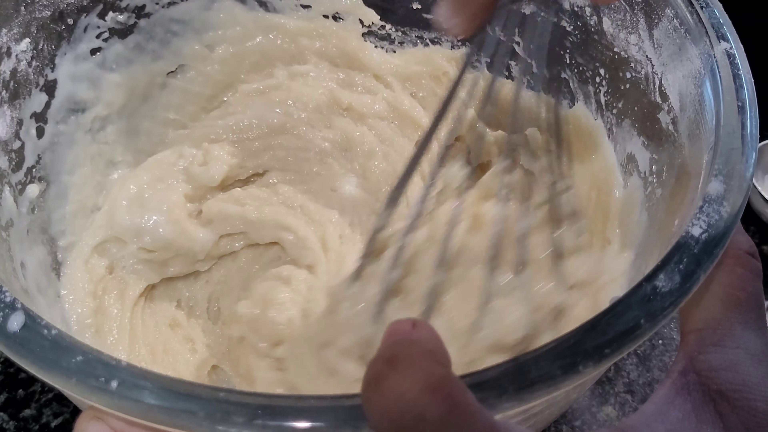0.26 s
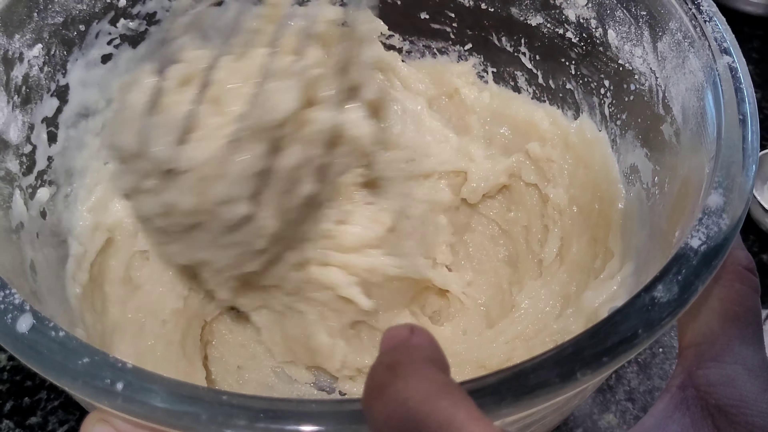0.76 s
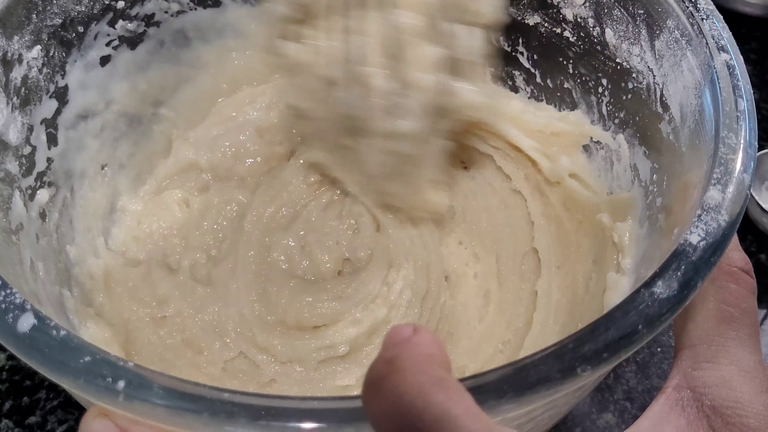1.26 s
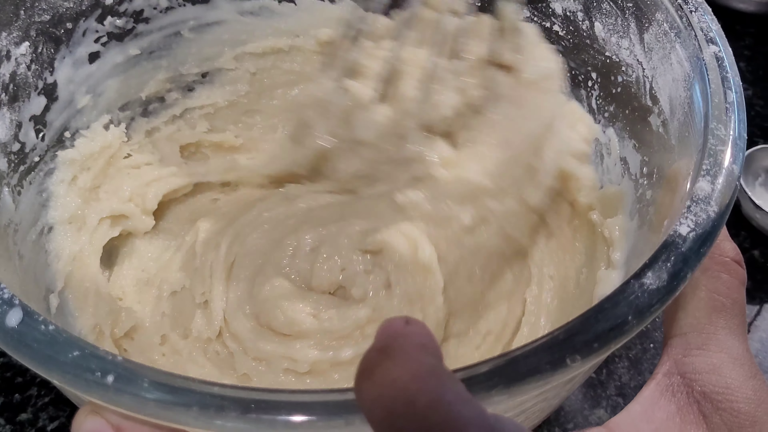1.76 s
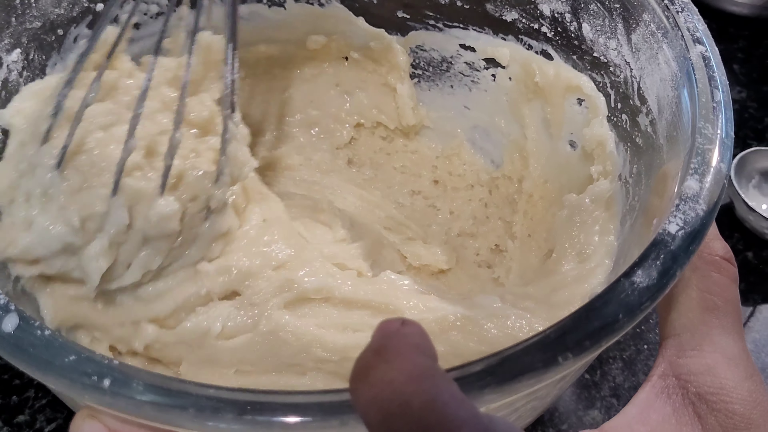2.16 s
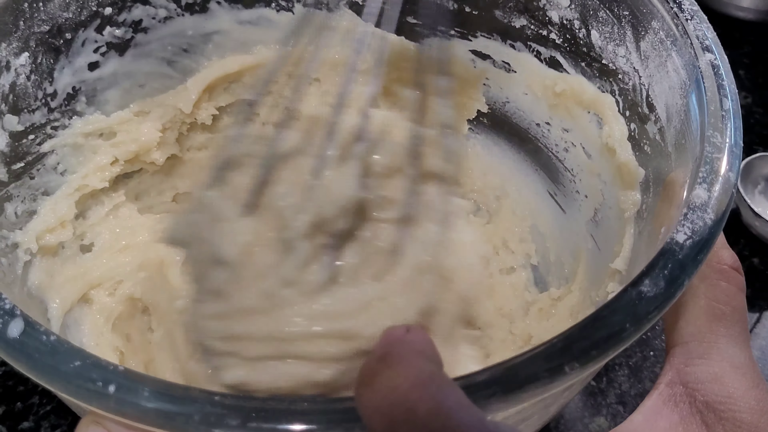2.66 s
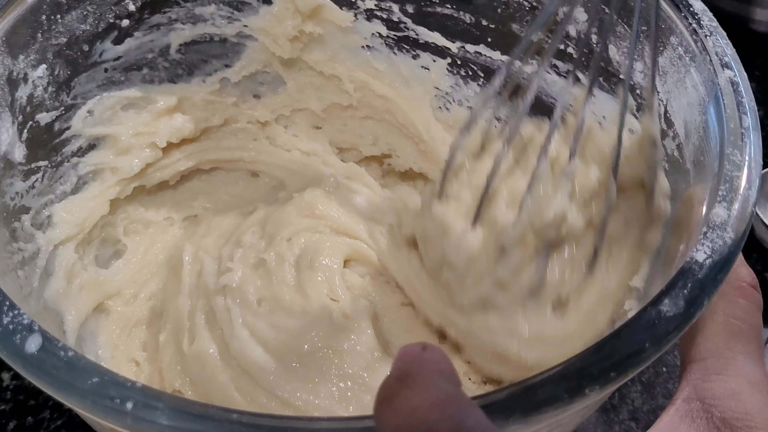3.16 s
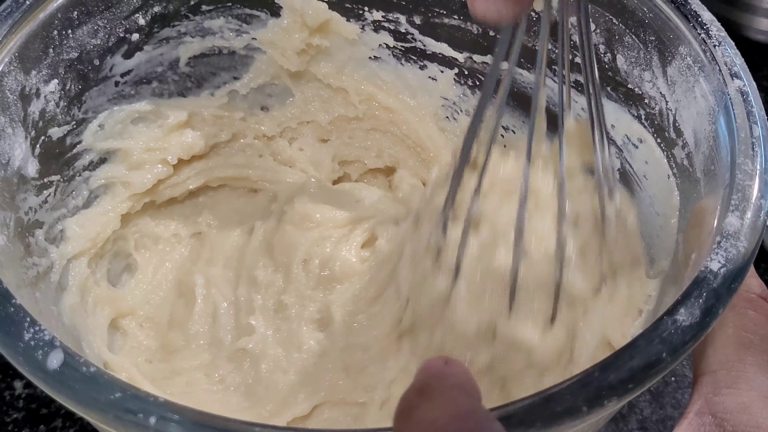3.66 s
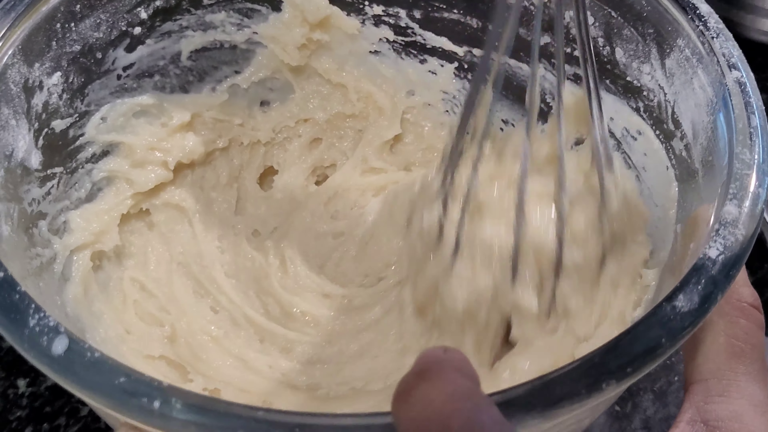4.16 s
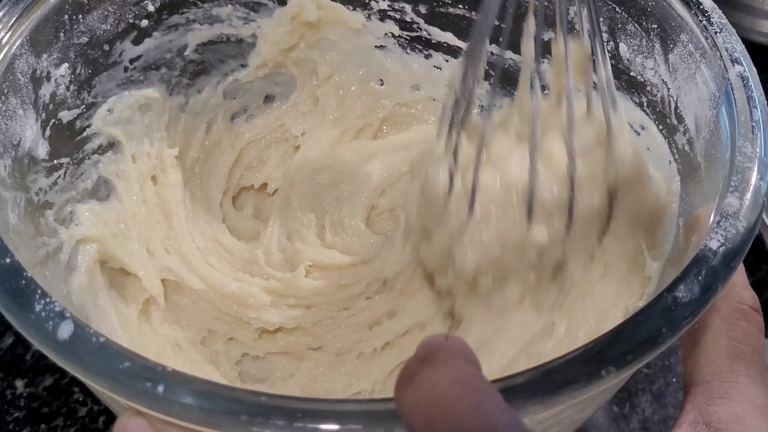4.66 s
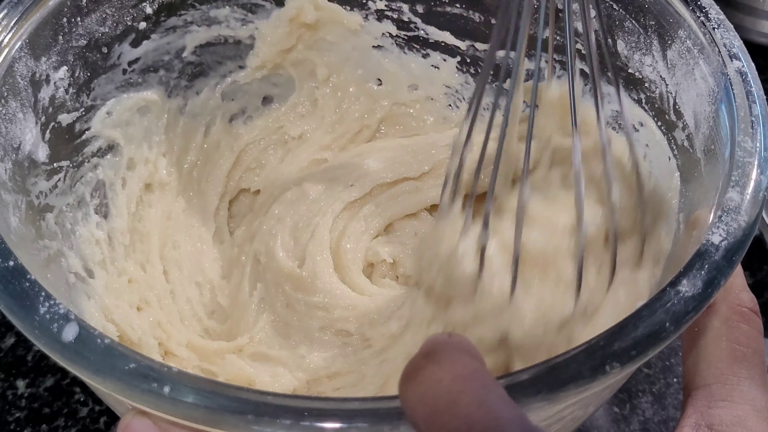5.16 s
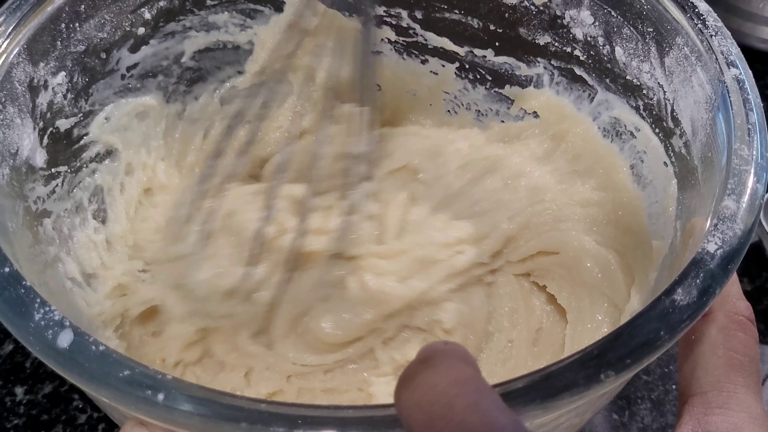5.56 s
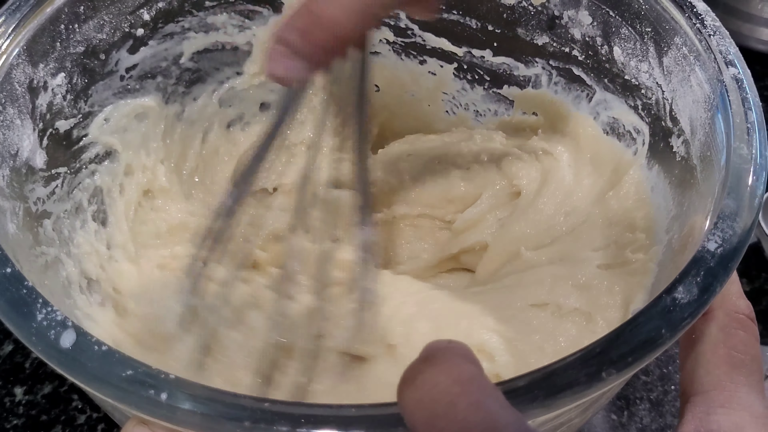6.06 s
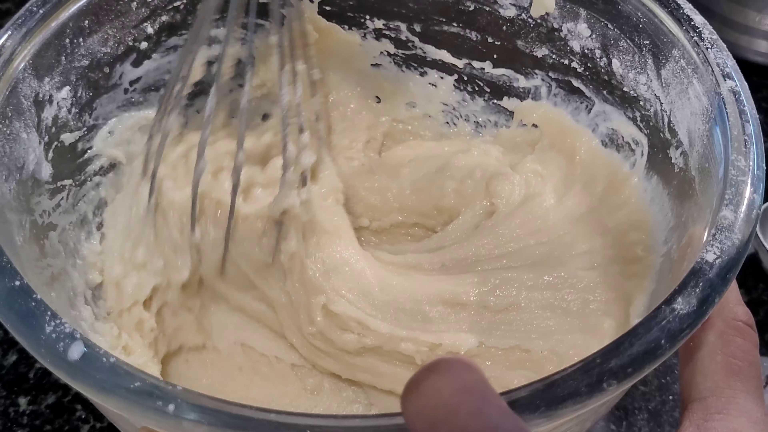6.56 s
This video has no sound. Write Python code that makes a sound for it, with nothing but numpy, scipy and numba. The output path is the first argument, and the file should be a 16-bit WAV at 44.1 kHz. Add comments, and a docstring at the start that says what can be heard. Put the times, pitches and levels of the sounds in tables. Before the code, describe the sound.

Hand whisking of stiff batter heard from very near, in stereo: repeated short scrapes swell and drop away, bright and gritty with a duller wet smear beneath. Wires tick on glass. Uneven thumps of the bowl on the counter punctuate the strokes, strongest in the first half, with brief hollow ringing and a short kitchen echo. Very faint squeaks and a quiet low background hum sit behind.

```python
"""In a small kitchen, a wire whisk drags thick batter round a glass bowl held on a stone counter, close to a phone.
Shaped noise makes the wires scrape and tick, the batter smack, and the low rumble and hiss behind.
The bowl rocks and now and then knocks on the counter: short pushes set off decaying sines for bowl and counter.
Delay lines let counter and kitchen ring on; small sine bursts are popping air, wavering tones are squeaks."""
import sys
import numpy as np
from scipy import signal
from scipy.fft import rfft, irfft, next_fast_len
from scipy.io import wavfile
from scipy.ndimage import uniform_filter1d
from numba import njit

SR = 44100
rng = np.random.default_rng(int(sys.argv[2]) if len(sys.argv) > 2 else 0)


def output_pcm(signal):
    """Save a mono or channel-first signal as 16-bit PCM at the path in sys.argv[1].

    Samples are clipped to [-1, 1] before scaling.
    """
    pcm = np.clip(np.atleast_2d(signal).T, -1, 1) * 32767
    wavfile.write(sys.argv[1], SR, np.round(pcm).astype(np.int16))


N = 299439

# ringing tones of the glass bowl: f/Hz, signed gain left, signed gain right, time to fall 60 dB/s
GLASS_MODES = [(279, .6, 1, .25), (722, .5, 1, .14), (1060, .6, .4, .1), (1180, -1, -1, .1),
               (1450, .6, .3, .05), (1620, 1, .5, .05), (2635, .6, .5, .05), (2680, .9, 1, .065),
               (4128, .7, .6, .04), (4260, .6, .7, .03)]


def undb(db):
    """Turns decibels into a factor."""
    return 10 ** (np.asarray(db) / 20)


def level(x, db):
    """Sets the average (RMS) level of x."""
    return x * undb(db) / np.sqrt(np.mean(x ** 2))


def curve(table):
    """Columns of a table, joined by straight lines in time."""
    s, *columns = np.transpose(table)
    return [np.interp(np.arange(N) / SR, s, c) for c in columns]


def sides(pan_db):
    """Left and right factors for a level difference, left minus right."""
    return undb(np.array([pan_db, -pan_db]) / 2)


def colour(x, table):
    """Shapes the spectrum of x by a table of f/Hz and gain/dB."""
    table_hz, db = np.transpose(table)
    size = next_fast_len(N)
    hz = np.arange(size // 2 + 1) * SR / size
    gain = undb(np.interp(np.log(hz + 1), np.log(table_hz), db))
    return irfft(rfft(x, size) * gain, size)[..., :N]


def band(x, lo_hz, hi_hz, order=2):
    """Keeps the sound between two frequencies."""
    sos = signal.butter(order, [lo_hz, hi_hz], "band", fs=SR, output="sos")
    return signal.sosfilt(sos, x)


def ring(x, hz, t60):
    """One ringing tone: every push starts a sine that falls 60 dB in t60 seconds."""
    r = np.exp(-np.log(1000) / (t60 * SR))
    w = 2 * np.pi * hz / SR
    # the tiny offset keeps the filter from slowing down on silence
    return signal.lfilter([0, r * np.sin(w)], [1, -2 * r * np.cos(w), r * r], x + 1e-18)


def walk(rate):
    """Random wandering: values held 1 / rate seconds, then smoothed twice."""
    k = int(SR / rate)
    steps = np.repeat(rng.standard_normal(N // k + 1), k)
    return uniform_filter1d(uniform_filter1d(steps, k), k)[:N]


def add(out, s, sound):
    """Mixes a sound into out, starting at s seconds."""
    i = int(s * SR)
    out[..., i:i + sound.shape[-1]] += sound[..., :N - i]


def kitchen():
    """House rumble, mostly alike at both microphones, under hiss that differs between them."""
    # deep rumble of the house: t/s, level/dB
    rumble_levels = [(0.0, -65), (0.05, -48), (0.21, -71), (0.74, -54), (1.21, -66), (1.28, -54.5),
                     (1.49, -66), (1.68, -47), (1.76, -83), (1.85, -62), (2.15, -68.5), (2.23, -45),
                     (2.42, -65.5), (3.46, -65.5), (3.52, -54.5), (3.67, -65), (5.77, -62.5), (5.88, -55),
                     (6.01, -73), (6.11, -49), (6.41, -76), (6.79, -61)]
    # tone of the steady background: f/Hz, relative gain/dB
    hush_tone = [(18, -46), (30, -30.5), (81, 2.5), (194, -0.5), (295, 2.5), (600, -6.5), (1190, -11.5),
                 (1280, -29), (1430, -13), (2100, -16), (3000, -32.5), (5170, -41), (5740, -19.5),
                 (7090, -16), (16000, -44)]
    low, wide = rng.standard_normal(N), rng.standard_normal((2, N))
    alike = low + .36 * wide
    rumble = level(band(alike, 47.2, 67.0), 0) + level(band(alike, 91, 190), -9)
    rumble = rumble * undb(curve(rumble_levels)[0])
    mixed = band(low, 84, 500, order=1) + band(wide, 280, .45 * SR, order=1)
    return rumble + level(colour(mixed, hush_tone), -63.5)


@njit
def walls(x, lags, gain, damp):
    """Eight delay lines feed each other like reflections, duller on every round."""
    line, soft, out = np.zeros((8, 4096)), np.zeros(8), np.zeros((2, len(x)))
    for i in range(len(x)):
        total = 0.
        for k in range(8):
            soft[k] += (1 - damp) * (gain[k] * line[k, (i - lags[k]) & 4095] - soft[k])
            total += soft[k]
            out[k % 2, i] += soft[k]
        for k in range(8):
            line[k, i & 4095] = x[i] + soft[k] - total / 4
    return out


def echoes(send):
    """Counter and kitchen ring on; long waves reach both microphones alike."""
    # lengths of the eight echo paths: delay/ms
    path_ms = [7.3, 9.7, 12.1, 15.7, 33, 23.9, 28.1, 32]
    t60_s, damp = 0.29, 0.15  # damp: treble loss per round, 0 to 1; it also shortens the fade
    lags = (np.array(path_ms) * SR / 1000).astype(np.int64)
    room = walls(send, lags, undb(-60 * lags / SR / t60_s), damp)
    return band(room[0], 27, 630, order=1) + band(room, 850, 15000, order=1)


def body(force, flex):
    """Bowl and counter ring; each microphone hears its own mix of the tones."""
    # ringing tones of bowl and counter: f/Hz, signed gain left, signed gain right, time to fall 60 dB/s
    body_modes = [(92.2, -0.0123, -0.0165, 0.31), (150.7, 0.03, 0.0256, 0.19), (245.5, -0.29, -0.41, 0.045),
                  (281.17, 0.043, 0.062, 0.25), (313.4, 0.29, 0.31, 0.054), (353, 0.03, 0.037, 0.38),
                  (383.3, 0.047, 0.24, 0.075), (434, -0.013, 0.089, 0.32), (439, 0.012, 0.0017, 0.59),
                  (499.7, -0.2, -0.47, 0.041), (535, -0.0039, 0.52, 0.073), (610.5, -0.097, -0.36, 0.0693),
                  (635, -0.0041, 0.18, 0.033), (679, -0.036, -0.12, 0.15), (714.3, 0.27, 0.47, 0.088),
                  (746.2, -0.2, -0.84, 0.081), (787, -0.27, 0.022, 0.081), (831, 0.16, -0.16, 0.078),
                  (896, -0.076, -0.32, 0.088), (937, -0.044, 0.29, 0.059), (1062, 0.0028, 0.084, 0.23),
                  (1090, -0.037, 0.13, 0.131), (1160, -0.02, 0.046, 0.045), (1188, -0.0081, -0.14, 0.1),
                  (1285, -0.0067, 0.0097, 0.14), (1382, 0.61, 0.27, 0.025), (1432, -0.51, -0.015, 0.062),
                  (1430, 0.16, -0.01, 0.13), (1560, 0.2, 0.015, 0.075), (1666, 0.21, -0.17, 0.041),
                  (1960, 0.15, 0.38, 0.037), (2040, 0.044, 0.17, 0.093), (2200, 0.26, -0.055, 0.04)]
    out = np.zeros((2, N))
    for hz, left, right, t60 in body_modes:
        push = flex if 120 < hz < 200 else force  # one deep tone is the slab flexing
        out = out + ring(push, hz, t60) * [[left], [right]]
    return out


def rocking():
    """Rocking and rubbing on the counter: uneven small bumps of the bowl's foot feed the same tones."""
    # how strongly the bowl rocks: t/s, level/dB
    rock_levels = [(0.0, -45.5), (0.09, -48), (0.26, -54.5), (0.64, -52.5), (0.77, -54.5), (1.27, -56),
                   (1.66, -61.5), (1.81, -55.5), (1.95, -61.5), (2.34, -48), (2.53, -59.5), (2.7, -54),
                   (2.93, -73), (3.14, -52), (3.29, -50.5), (3.48, -59), (3.74, -62), (3.95, -58),
                   (4.12, -57.5), (4.35, -54), (4.73, -60), (5.05, -55), (5.18, -81), (5.41, -63),
                   (5.71, -55), (5.92, -59), (6.01, -57.5), (6.24, -57.5), (6.41, -65), (6.79, -59)]
    bumps = rng.standard_normal(N) * undb(4.1 * walk(40))
    force = band(bumps, 59.0, 364, order=3)
    return level(body(force, 2.23 * force), 0) * undb(curve(rock_levels)[0])


def landings():
    """The foot lands and rebounds once; a softer landing is a longer push."""
    # knocks on the counter: t/s, blow/dB, push length/ms, rebound share of the blow, extra slab flex/dB
    knock_list = [(0.041, -35.5, 0.25, 1, 11.5), (0.077, -34, 0.65, 0.198, 0), (0.087, -40, 0.67, 0.3, 11),
                  (0.136, -35, 0.77, 0.26, -7), (0.253, -31.5, 0.74, 0.26, 10),
                  (0.282, -31, 0.97, 0.21, -5), (0.434, -39, 0.28, 0.3, -11),
                  (0.465, -25.5, 0.74, 0.56, -28), (0.573, -32, 1, 0.37, -7), (0.70, -36.5, 0.63, 0.43, 15),
                  (0.769, -28.5, 1, 0.4, -5), (1.228, -28, 0.71, 0.38, -5.5), (1.2174, -49, 0.19, 0.4, -4),
                  (1.595, -8.5, 0.27, 0.038, 12), (1.946, -19, 0.61, 0.55, 0.5),
                  (1.962, -41, 0.62, 0.14, -3), (2.005, -28.5, 0.7, 0.25, -10.5),
                  (2.2005, -5, 0.24, 0.061, 7), (2.2105, -10, 0.21, 0.22, 3.5),
                  (2.224, -18.5, 0.23, 0.22, -8.5), (2.9118, -16.5, 0.44, 0.41, -4),
                  (2.948, -36, 0.95, 0.3, -2), (2.972, -28, 0.59, 0.33, -9), (3.046, -36, 0.27, 0.35, -5),
                  (3.057, -36, 0.39, 0.31, -6.5), (3.18, -34, 0.64, 0.24, -3), (3.250, -22, 0.59, 0.3, -8),
                  (3.266, -37, 0.78, 0.34, -5.5), (3.312, -19.5, 0.58, 0.28, -7),
                  (3.329, -41, 0.53, 0.25, -4), (3.5151, -9.5, 0.24, 0.032, 7.5),
                  (3.5254, -21, 0.24, 0.18, -2), (3.5331, -19.5, 0.36, 0.16, 8),
                  (3.552, -18, 0.43, 0.27, 11), (4.285, -36.5, 0.5, 0.3, -7), (4.4389, -35, 0.152, 0.2, -7),
                  (4.448, -24, 0.52, 0.26, -8.5), (4.909, -32.5, 0.78, 0.13, 6),
                  (4.974, -37, 0.63, 0.19, -11), (5.043, -22, 0.541, 0.474, -1),
                  (5.103, -31, 0.67, 0.27, -9), (5.124, -29, 0.74, 0.19, 3), (5.51, -33.5, 0.79, 0.2, -10),
                  (5.536, -34, 0.84, 0.31, -7), (5.565, -34, 0.71, .1, -7), (5.5698, -11.5, 0.49, 0.25, -4),
                  (5.8126, -10.5, 0.56, 0.2, 0.5), (5.58, -27.5, 0.26, 0.21, -7.5),
                  (5.826, -29, 0.3, 0.16, -7.5), (5.864, -45, 0.89, 0.42, -6.5),
                  (5.959, -28, 0.78, 0.42, 0.5), (6.0615, -11, 0.35, 0.53, -1.5),
                  (6.072, -33.5, 0.11, 0.49, 6), (6.5872, -16.5, 0.51, 0.39, -1.5),
                  (6.601, -28, 0.48, 0.24, -3)]
    rebound_ms = 6.075
    chatter_db, chatter_t60_s = -22, 0.35
    lead = 88  # samples ahead of the middle of the push
    force, ms = np.zeros((2, N)), np.arange(-lead, 8000) / SR * 1000
    chatter_gain = undb(chatter_db - 60 * ms / 1000 / chatter_t60_s)
    for s, db, push_ms, share, flex_db in knock_list:
        push = np.exp(-(ms / push_ms) ** 2)
        again = np.exp(-((ms - rebound_ms) / push_ms) ** 2)
        edge = np.exp(-((ms + push_ms) / 0.2) ** 2)  # a small hard edge in front
        blow = (push + share * again) / push.sum() + 0.12 * edge / edge.sum()
        # the foot chatters on: about 600 random bumps a second, fading
        bumps = rng.standard_normal(len(ms)) * (rng.random(len(ms)) < 600 / SR) * (ms > 0)
        chatter = np.convolve(bumps * chatter_gain, push[:200] / push.sum())
        blow = blow + chatter[lead:lead + len(ms)]
        add(force, s - lead / SR, undb([[db], [db + flex_db]]) * blow)
    return force


def pings():
    """The glass is struck, by a wire or on landing; each strike mostly drives tones near its centre."""
    # strikes on the glass: t/s, strength/dB, centre f/Hz
    strike_list = [(0.97, -48, 4300), (1.5953, -32, 1550), (1.602, -26, 280), (1.611, -21, 730),
                   (2.194, -33, 2700), (2.2115, -22, 730), (2.2105, -23, 1170), (2.224, -27.5, 800),
                   (2.645, -49, 1200), (2.915, -55.5, 2200), (2.926, -39.5, 840), (3.06, -49, 2700),
                   (3.134, -49, 1480), (3.193, -35.5, 2620), (3.254, -44.5, 1200), (3.264, -32, 3300),
                   (3.357, -44, 2700), (3.5162, -38, 1350), (3.522, -19.5, 730), (3.530, -26, 740),
                   (4.443, -41, 1900), (4.445, -53, 2600), (5.571, -44, 1190), (5.585, -40, 750),
                   (5.814, -38.5, 980), (5.825, -40.5, 740), (6.064, -30.5, 1020), (6.064, -52, 4000),
                   (6.072, -40, 1180)]
    reach_octaves = 0.5
    out, touch = np.zeros((2, N)), np.hanning(8) / np.hanning(8).sum()
    for hz, left, right, t60 in GLASS_MODES:
        taps = np.zeros(N)
        for s, db, centre_hz in strike_list:
            share = np.exp(-(np.log2(hz / centre_hz) / reach_octaves) ** 2)
            add(taps, s, undb(db) * touch * share)
        out = out + ring(taps, hz, t60) * [[left], [right]]
    return out


def squeak():
    """A wire rubs the glass: faint wavering tones that climb quickly, then stay near one pitch."""
    # squeaks: start t/s, length/s, level/dB before the swell and waver
    squeak_list = [(1.64, .09, -68), (2.1, 0.11, -69), (3.96, .05, -72), (4.04, 0.22, -67.5),
                   (6.46, .12, -73)]
    from_hz, to_hz, climb_s = 5500, 5800, .03
    t, out = np.arange(N) / SR, np.zeros(N)
    waver_db, waver_hz = 4 * walk(60), 60 * walk(40) + 90 * walk(300)
    for s, length, db in squeak_list:
        age = np.clip(t - s, 0, length)
        hz = to_hz - (to_hz - from_hz) * np.exp(-age / climb_s) + waver_hz
        swell = np.sqrt(2 * np.sin(np.pi * age / length).clip(0))
        tone = np.sin(2 * np.pi * np.cumsum(hz) / SR)
        out = out + undb(db + waver_db) * swell * tone
    return out


def ticks():
    """Wires tick and batter slaps: noise bursts, wide around their centre, a snap then a fizzy tail."""
    # ticks of single wires: t/s, peak/dB before panning, centre f/Hz, left minus right/dB
    tick_list = [(0.0454, -40, 8500, -5), (0.1005, -44, 7500, -4), (0.142, -46, 7000, -3),
                 (0.201, -35.5, 6600, 4), (0.252, -38.5, 12500, -20), (0.2908, -35.5, 11000, 5.5),
                 (0.679, -36, 14600, 8), (0.8828, -33.5, 10460, 5), (0.9414, -41, 10000, 0.5),
                 (0.9696, -31, 11600, -4), (1.067, -35.5, 9200, 1), (1.1643, -38, 11000, 5),
                 (1.2164, -28.5, 12900, 0), (1.288, -29, 10900, 4), (1.3124, -31, 11900, 8),
                 (1.3264, -41, 12350, 4.5), (1.347, -31, 10950, 2), (1.583, -31.5, 11200, -1),
                 (1.741, -33, 14400, 7), (1.768, -36, 12900, 12), (1.826, -32, 12000, 2.5),
                 (1.881, -36.5, 5200, 9), (1.9725, -30.5, 3640, -6), (2.0384, -33, 11770, 1.5),
                 (2.0952, -39, 9920, 4), (2.194, -31.5, 5350, -1.5), (2.2825, -33, 11000, 1),
                 (2.3597, -37.5, 5330, 3), (2.5592, -33, 5300, 7.5), (2.8877, -40.5, 13220, 2),
                 (2.971, -37.5, 4150, -8.5), (3.0241, -27.5, 9050, -1), (3.0461, -28, 8170, -5),
                 (3.138, -33, 3550, -3), (3.2178, -34, 3740, 4), (3.335, -50.5, 4770, -3),
                 (3.3549, -31, 4020, -1), (3.4983, -34, 3440, -3), (3.5255, -33, 11300, 3),
                 (3.64, -33, 6400, 0), (3.68, -36, 7350, 0), (3.755, -33.5, 11200, 4),
                 (3.8001, -40, 11760, 5), (3.981, -34, 8400, -3), (4.248, -39.5, 3940, 2.5),
                 (4.374, -41.5, 4930, -8), (4.519, -39.5, 14700, 1), (4.745, -41.5, 7650, 0.5),
                 (4.772, -28, 9000, 2), (4.9037, -34, 4700, 4), (5.013, -36, 11000, -4),
                 (5.307, -36, 10800, -5.5), (5.412, -43, 11000, 3), (5.56, -47, 5000, -2),
                 (5.5671, -48, 12000, 6.5), (5.632, -48, 9000, -1), (5.745, -45, 10000, 4),
                 (5.839, -39, 11600, 4.5), (5.873, -42.5, 10460, 6.5), (5.932, -40, 13500, 6.5),
                 (6.051, -42.5, 4190, 3), (6.114, -29, 6100, 1.5), (6.259, -45, 9760, 3),
                 (6.706, -53, 7170, -3.5)]
    # wet slaps of batter: same columns, t/s, peak/dB, f/Hz, left minus right/dB
    slap_list = [(0.042, -36, 1150, 7), (0.433, -35.5, 1790, 9), (1.1353, -50, 2080, -1),
                 (1.217, -33, 1490, 2.5), (1.3473, -44, 1770, 7), (3.0546, -58.5, 1670, -0.5),
                 (3.133, -50, 1430, 2), (3.2614, -53, 1170, 6), (4.439, -49, 1650, 4),
                 (4.4485, -46, 1060, 13), (5.3065, -41.5, 1940, 6.5)]
    tail_t60_s = 0.067
    out, t = np.zeros((2, N)), np.arange(2000) / SR
    shape = np.exp(-t / 0.0006) + 0.33 * np.exp(-np.log(1000) * t / tail_t60_s)
    for s, db, hz, pan_db in tick_list + slap_list:
        noise = rng.standard_normal((3, 2000))
        two_sided = noise[:2] + 0.15 * noise[2]  # a little shared by both sides
        burst = band(two_sided * shape, hz / 1.24, hz * 1.25, order=1)
        add(out, s, burst / np.abs(burst).max() * undb(db) * sides(pan_db)[:, None])
    return out


def drags():
    """Gains of treble and wet mids: every drag swells, holds and fades; their powers add."""
    # drags of the wires along the glass: start t/s, swell/s, hold/s, fade/dB per s,
    # treble level/dB, wet mids above treble/dB
    drag_list = [(0.0, 0.001, 0.0073, 60, -49, -5), (0.139, 0.086, 0.0052, 40, -54, -19),
                 (0.321, 0.1, 0.025, 90, -45.5, -7.5), (0.56, 0.096, 0.0053, 26, -54, -8),
                 (0.904, 0.039, 0.0028, 183.5, -53, -8), (0.982, 0.193, 0.0158, 183, -48.5, -4.5),
                 (1.234, 0.11, 0.01, 326.5, -47.5, -10.5), (1.566, 0.028, 0.0069, 43, -52.5, 0),
                 (1.648, 0.14, 0.0049, 201, -44.5, -10.5), (1.786, 0.13, 0.076, 185.5, -44.5, -4.5),
                 (2.087, 0.01, 0.004, 188, -51.5, -13), (2.179, 0.015, 0.0075, 179, -42, -5),
                 (2.273, 0.021, 0.0051, 198.5, -49, -25), (2.312, 0.045, 0.34, 138, -46.5, -11),
                 (2.441, 0.068, 0.17, 154, -53, 2), (2.862, 0.13, 0.0047, 123, -55, -3),
                 (3.019, 0.044, 0.0051, 279, -44.5, -5), (3.067, 0.071, 0.23, 187, -45, -8.5),
                 (3.485, 0.019, 0.013, 139, -47.5, -2), (3.619, 0.021, 0.0048, 61, -49.5, -5),
                 (3.84, 0.07, 0.0045, 72, -49.5, -5.5), (3.997, 0.18, 0.24, 146.5, -50.5, -11),
                 (4.426, 0.016, 0.0042, 199.5, -53, 0.5), (4.467, 0.0424, 0.18, 43, -53, -8.5),
                 (4.716, 0.053, 0.0049, 61, -53, -7), (4.85, 0.028, 0.0052, 66, -55.5, -7.5),
                 (4.932, 0.1716, 0.031, 119, -47, -8.5), (5.172, 0.018, 0.089, 108, -68, -13.5),
                 (5.293, 0.018, 0.0049, 120, -51.5, -24), (5.325, 0.047, 0.072, 86.5, -65, 5.5),
                 (5.553, .015, .01, 101, -56.5, -8), (5.588, 0.051, 0.075, 130.5, -51.5, -9.5),
                 (5.738, 0.0123, 0.0097, 94, -54.5, -8.5), (5.784, 0.057, 0.041, 147, -57, -0.5),
                 (5.896, 0.037, 0.024, 184, -63, -6), (6.032, 0.099, 0.0505, 94, -48, -8),
                 (6.424, 0.262, 0.056, 81, -49.5, -5)]
    rest_db, rest_wet_db = -73.5, -70.5  # between drags
    swell_power = 2.17
    wet_fade = 0.99  # the wet mids fade at this share of the treble's rate
    power = undb([[rest_db], [rest_wet_db]]) ** 2 * np.ones(N)
    age = np.arange(SR) / SR  # each drag lasts one second at most
    for s, swell, hold, fade, db, wet_db in drag_list:
        rise = np.minimum(age / max(swell, .002), 1) ** swell_power
        lost_db = fade * np.maximum(age - swell - hold, 0)
        gain = undb([db - lost_db, db + wet_db - wet_fade * lost_db])
        add(power, s, rise * gain ** 2)
    return np.sqrt(power)


def pops():
    """Tiny air pockets in the batter burst at random: short dying sines of any pitch from 1 to 13 kHz."""
    pops_per_s, pop_db, scatter_db = 160, -16.5, 20.5
    t60_cycles = 9.4  # cycles until a pop has fallen 60 dB
    out, t = np.zeros((2, N)), np.arange(600) / SR
    for at, pitch, size, pan in rng.random((int(pops_per_s * N / SR), 4)):
        hz = 1000 * 13 ** pitch
        pop = np.sin(2 * np.pi * hz * t) * np.exp(-np.log(1000) * t * hz / t60_cycles)
        gain = undb(pop_db + scatter_db * size ** 2)
        add(out, at * N / SR, pop * gain * sides(12 * (pan - .5))[:, None])
    return out


def patchy(lo_hz, hi_hz, patch_db, count):
    """Hiss in neighbouring bands, each with its own slightly wandering level."""
    # tone of the scraping: f/Hz, relative gain/dB
    scrape_tone = [(530, 14), (900, 3), (1220, 3), (1700, 4.5), (2600, 2), (3110, 0), (5610, -3.5),
                   (7140, -4.5), (11800, -1.5), (14900, -4.5), (16000, 4)]
    patch_per_s = 14
    edges = np.geomspace(lo_hz, hi_hz, count + 1)
    hiss = np.zeros((2, N))
    for lo, hi in zip(edges, edges[1:]):
        wander = walk(patch_per_s) + walk(3 * patch_per_s)
        hiss = hiss + band(rng.standard_normal((2, N)), lo, hi) * undb(patch_db * wander)
    return colour(hiss * undb(2.1 * walk(60)), scrape_tone)


def scrape():
    """Wires slip over glass and sugar: hiss broken by dense tiny clicks; the glass rings along."""
    treble_gain, mids_gain = drags()
    click_sizes = undb(np.minimum(2.7 * rng.exponential(size=N), 14))
    clicks = (rng.random(N) < 400 / SR) * click_sizes  # about 400 a second
    grain = signal.lfilter([1], [1, -.975], clicks)  # every click dies within a few milliseconds
    treble = level(patchy(4245, 17930, 1.6, count=3) * (1 + .5 * grain), 0)
    # wet batter: duller, less clicky
    mids = level(patchy(554.5, 4240, 3.2, count=7) * (1 + 0.16 * grain), 0)
    glass = np.zeros((2, N))
    for hz, left, right, t60 in GLASS_MODES:
        if hz > 1100:
            glass = glass + ring(clicks - clicks.mean(), hz, t60) * [[left], [right]]
    glass = level(glass.sum(axis=0) if glass.ndim == 1 else glass, -22.5)
    sway = sides(-0.5 + 2 * walk(7.9))  # left minus right in dB, slowly swaying
    return ((treble + pops()) * treble_gain + (mids + glass) * mids_gain) * sway


def scene():
    """Mixes knocks, whisk, glass, echoes and background."""
    force, flex = landings()
    thumps = body(force, flex) + rocking()
    whisk = scrape() + ticks() + squeak()
    glass = pings()
    # the slab also sends each blow away from the phone, without the near ringing tones
    slab = undb(15.0) * band(force, 447, 1350)
    send = undb(-20.0) * thumps.mean(axis=0) + slab
    send = send + undb(-12.5) * whisk.mean(axis=0) + undb(-14) * glass[1] + 1e-18
    thumps = thumps + glass + echoes(send)
    # the counter is nearer the left microphone, so the right one hears it later
    lag = 8  # samples
    thumps[1] = np.concatenate([np.zeros(lag), thumps[1, :-lag]])
    return thumps + whisk + kitchen()


def record(dry):
    """The left microphone is a little brighter; the phone cuts the deep bass and the top."""
    dry = dry + band(dry, 6500, 14000, order=1) * [[.17], [-.17]]
    dry = signal.sosfilt(signal.butter(3, 42, "high", fs=SR, output="sos"), dry)
    return signal.sosfilt(signal.ellip(10, .2, 70, 15700, fs=SR, output="sos"), dry)


dry = scene()
out = record(dry)
output_pcm(out)
```